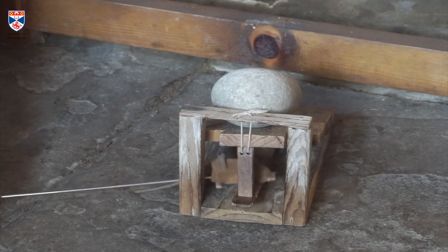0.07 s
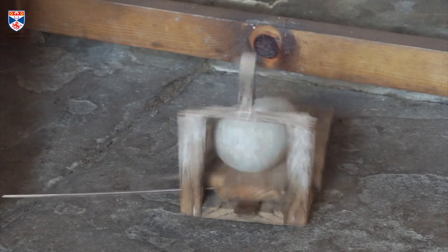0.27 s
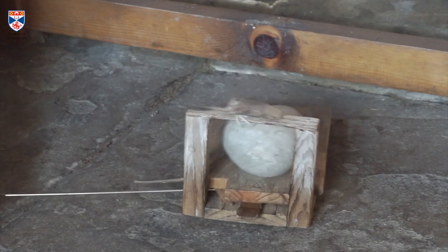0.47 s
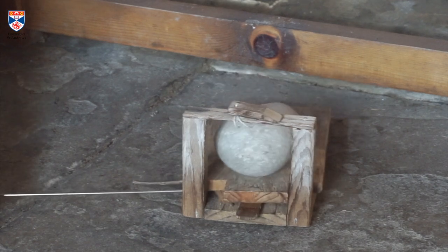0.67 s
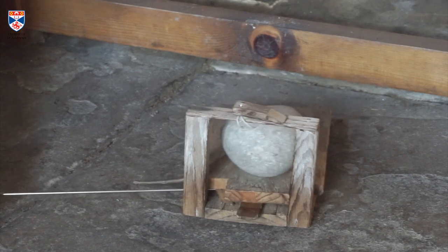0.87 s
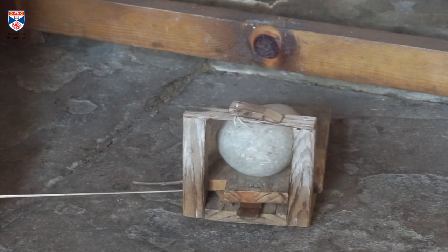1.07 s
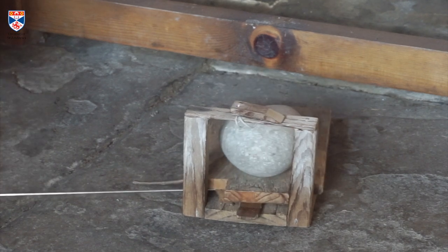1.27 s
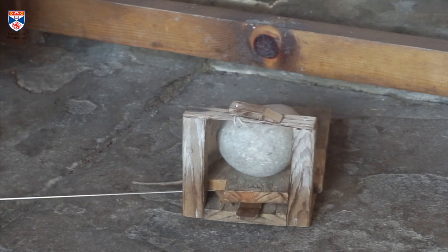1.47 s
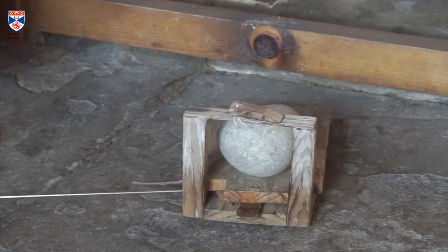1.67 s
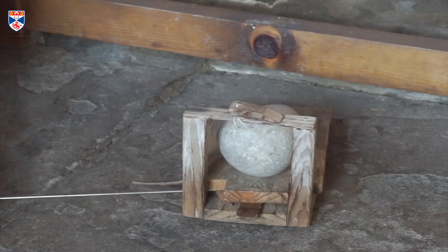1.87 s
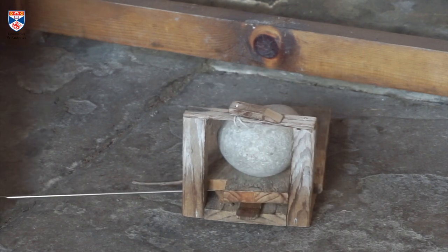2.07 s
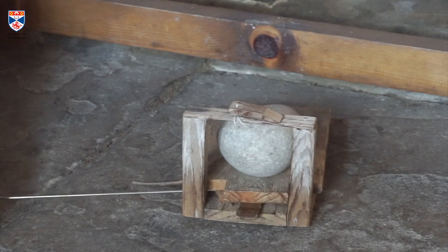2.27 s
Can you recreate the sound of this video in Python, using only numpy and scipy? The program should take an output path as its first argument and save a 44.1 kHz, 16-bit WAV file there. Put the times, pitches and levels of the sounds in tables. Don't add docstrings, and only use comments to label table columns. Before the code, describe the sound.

A stone-weighted wooden trap slams shut, close up in a small hard room. Faint ticks precede a sharp stick crack at 0.25 seconds, then the loud, hollow board slam at 0.34, chattering densely until about 0.5. A small peg ticks at 0.55. Quiet dull knocks come around 1.06 and 2.16, with tiny clicks near 1.5 and 1.75, over steady hiss and a faint low throbbing rumble.

```python
import sys
import numpy as np
from scipy import signal
from scipy.fft import rfft, irfft, next_fast_len
from scipy.io import wavfile
from scipy.ndimage import map_coordinates

SR = 44100
rng = np.random.default_rng(int(sys.argv[2]) if len(sys.argv) > 2 else 0)


def dump_mix(stems):
    frames = np.atleast_2d(stems).T
    limited = np.clip(frames, -1, 1)
    pcm = np.round(limited * 32767).astype(np.int16)
    wavfile.write(sys.argv[1], SR, pcm)


def how_loud(loudness_db):
    steps = np.asarray(loudness_db, float) / 20
    return 10 ** steps


N = 102135


def unit(x):
    return x / np.sqrt(np.mean(x ** 2) + 1e-20)


def along(points, hz):
    f, v = np.transpose(points)
    return np.interp(np.log(hz + 1), np.log(f + 1), v)


def over_time(points):
    return how_loud(np.interp(np.arange(N) / SR, *np.transpose(points)))


def wobble(rate):
    knots = rng.standard_normal(int(N * rate / SR) + 4)
    return map_coordinates(knots, [np.arange(N) * rate / SR])


def filtered(x, response):
    m = next_fast_len(x.shape[-1] + 8192)
    spectrum = rfft(x, m) * response(np.fft.rfftfreq(m, 1 / SR))
    return irfft(spectrum, m)[..., :x.shape[-1]]


def spread(pair, alike):
    def mid_side(hz):
        turn = np.arccos(np.clip(along(alike, hz), -1, 1)) / 2
        return np.array([np.cos(turn), np.sin(turn)])

    mid, side = filtered(pair, mid_side)
    return np.array([mid + side, mid - side])


def noise_pair(colour):
    return filtered(rng.standard_normal((2, N)), lambda hz: how_loud(along(colour, hz)))


# (frequency [Hz], time to fall 60 dB [s])
ROOM_DECAY = [(150, 0.84), (600, 0.33), (1300, 0.28), (3000, 0.28), (6000, 0.35), (11000, 0.089)]
# (frequency [Hz], likeness [0-1])
ROOM_LIKENESS = [(300, .93), (1200, 0.98), (2500, .75), (5000, 0.62), (10000, .05)]


def room(x):
    hz, t, z = signal.stft(rng.standard_normal((2, SR // 2)), SR, nperseg=256)
    decay = how_loud(-60 * t / along(ROOM_DECAY, hz)[:, None])
    tail = signal.istft(z * decay, SR, nperseg=256)[1]
    delay_s = 0.006
    tail = np.pad(spread(tail, ROOM_LIKENESS), ((0, 0), (round(delay_s * SR), 0)))
    return signal.fftconvolve(x[None], tail / np.linalg.norm(tail[0]), axes=1)


TRIM_DB = dict(stick=3, board=-1.5, knock=4.5, tap=16.5, tick=8.5, peg=1, snap=-1.5)
ECHO_DB = dict(stick=-2, board=-4.5, knock=-3.5, tap=-2, tick=-5.5, peg=-5.5, snap=-7.5)
FIRST_TOUCH = dict(stick=2.8, board=4.4, knock=5.3, tap=1.25, tick=0.13, peg=2.44, snap=0.19)
SOFT_HZ = dict(stick=9000, board=5300, knock=3957, tap=4500, tick=20000, peg=8850, snap=20000)
# (frequency [Hz], likeness [0-1])
DIRECT_LIKENESS = [(1000, 0.99), (3000, 0.93), (8000, 0.56)]


def strike(name, s, db, length, body, soft_hz=None):
    u = np.arange(SR // 5) / SR / length
    rough = rng.standard_normal((2, len(u))) * (1 - np.exp(-8 * u)) * np.exp(-2 * u)
    force = rough + FIRST_TOUCH[name] * (u == 0)

    body = np.array(body)
    shift, vary_db = 0.012, 2
    here = body + rng.standard_normal((len(body), 1)) * body * [shift, 0, 0]
    here = here + rng.standard_normal((len(body), 1)) * [0, 0, vary_db]
    thin_hz = 330
    top_hz = soft_hz or SOFT_HZ[name]

    def response(f):
        edges = (1j * f / (thin_hz + 1j * f)) ** 2 / (1 + 1j * f / top_hz) ** 2
        modes = 0
        for k, (centre, width, gain_db) in enumerate(here):
            mode = 1j * f * width / (centre * centre - f * f + 1j * f * width)
            modes = modes + (-1) ** k * how_loud(gain_db) * mode
        return edges * modes

    ring = filtered(force, response)
    ring = how_loud(db + TRIM_DB[name]) * ring / np.abs(ring[0]).max()
    heard = how_loud(ECHO_DB[name]) * room(ring[0])
    heard[:, :len(u)] += spread(ring, DIRECT_LIKENESS)
    out = np.zeros((2, N + SR))
    out[:, round(s * SR):][:, :heard.shape[1]] = heard
    return out[:, :N]


def blows(name, events, body):
    return sum(strike(name, s, db, length, body) for s, db, length in events)


# (time [s], peak level [dB], contact length [s])
BOARD = [(0.297, -15.5, 0.012), (.3433, -4, .002), (0.346, -8.5, 0.0045), (0.35, -4, 0.0071),
         (.354, -4, .005), (.359, -14.5, 0.01), (.367, -15, .006), (0.376, -6.5, 0.006),
         (0.381, -4, 0.0044), (.385, -9.5, 0.0056), (0.394, -14, .004), (0.407, -19.5, 0.0068),
         (0.384, -17, 0.0016), (0.418, -13.5, 0.0058), (0.4254, -5, 0.0047), (.436, -29, 0.0033),
         (0.457, -17, 0.0067), (0.463, -13, 0.0076), (0.492, -22.5, 0.0037), (0.505, -23, 0.0049),
         (0.561, -32.5, 0.0038), (0.577, -37, 0.0032), (0.627, -34, .008), (.642, -39, 0.009),
         (0.676, -63, 0.0036)]
# (frequency [Hz], width [Hz], level [dB])
BOARD_BODY = [(513, 54, -8), (679, 61, -7.5), (760, 89, -8), (921, 72, -6.5), (1146, 120, 3.5),
              (1258, 77, 6.5), (1344, 46, 5.5), (1778, 300, -9), (2430, 240, -15), (2900, 170, -13.5),
              (3740, 870, -19), (4040, 800, -23), (5450, 1400, -29)]


def board():
    return blows("board", BOARD, BOARD_BODY)


THUD_HZ = [99, 181, 275.5]
THUD_DB = [-44, -38.5, -39]


def thud():
    start_s, t60_s = 0.331, 0.21
    t = np.maximum(np.arange(N) / SR - start_s, 0)
    fall_db = -60 * t / t60_s
    return sum(how_loud(db + fall_db) * np.sin(2 * np.pi * hz * t) for hz, db in zip(THUD_HZ, THUD_DB))


# (time [s], peak level [dB], contact length [s])
STICK = [
    (0.2533, -9.5, 0.0028),
    (0.2565, -6, 0.0027),
    (.262, -14, 0.0017),
    (0.27, -19, 0.0079),
    (0.317, -21, .003),
    (.329, -19, .004),
    (0.3545, -10, 0.0016),
    (0.371, -24, .003),
    (0.388, -16, 0.0044),
]
# (frequency [Hz], width [Hz], level [dB])
STICK_BODY = [(470.2, 200, -12), (837.5, 170, -2.5), (1310, 91, 3.5), (1600, 90, -4.5), (1707, 150, 0),
              (2310, 250, -6.5), (2900, 170, -4.5), (3590, 250, -9), (4300, 500, -16.5), (5600, 2300, -24),
              (8000, 2500, -32)]


def stick():
    return blows("stick", STICK, STICK_BODY)


# (time [s], peak level [dB], contact length [s])
PEG = [
    (0.5542, -27, 0.0048),
    (0.633, -42, 0.00444),
]
# (frequency [Hz], width [Hz], level [dB])
PEG_BODY = [(2556, 98, 9.5), (3480, 390, -3.5), (4800, 620, -9.5)]


def peg():
    return blows("peg", PEG, PEG_BODY)


# (time [s], peak level [dB], centre frequency [Hz], length [s])
SNAPS = [(.001, -42, 1400, 0.033), (.002, -54, 300, 0.023), (0.2539, -8, 1736, 0.0022),
         (.2572, -2, 1734, 0.0017), (0.273, -20, 2400, 0.007), (0.313, -25, 490, 0.014),
         (0.3427, -2, 850, 0.00107), (0.3499, -3, 2900, 0.0009), (.387, -17, 2950, 0.0029),
         (0.4227, -8, 880, 0.01), (0.433, -38.5, 326, 0.035), (0.522, -38, 330, 0.015),
         (0.5465, -30, 2560, 0.0015), (1.058, -43, 190, 0.008), (1.498, -32, 9100, 0.023),
         (1.764, -42, 6130, .002), (2.28, -50.5, 2300, .03)]


def snaps():
    sharpness, soft_ratio = 6, 1.6
    return sum(strike("snap", s, db, length, [(hz, hz / sharpness, 0)], soft_ratio * hz)
               for s, db, hz, length in SNAPS)


# (time [s], peak level [dB], centre frequency [Hz], length [s])
TICKS = [(.001, -48, 694, .02), (.001, -53, 1135, 0.047), (.002, -61.5, 2130, .04), (.16, -51, 1600, .005),
         (0.159, -47, 2600, .004), (0.164, -53, 3770, 0.0074), (0.238, -43, 6550, 0.006),
         (.2385, -44, 3230, .008), (0.237, -46.5, 1180, 0.012), (0.4105, -28, 5965, 0.0018),
         (0.638, -52.5, 239, 0.0085), (0.919, -63.5, 1273, 0.01), (.961, -48.5, 1350, 0.0053),
         (.96, -52, 755, .004), (.962, -52.5, 3000, 0.0091), (1.496, -44.5, 6800, 0.025),
         (1.52, -52.5, 4740, 0.0201), (1.5, -56.5, 1560, 0.065), (1.677, -50, 7640, 0.0028),
         (1.732, -60.5, 4260, 0.013), (1.733, -56.5, 1650, .008), (1.764, -53.5, 3950, .003),
         (1.765, -58, 1720, 0.0066), (1.807, -65, 3710, 0.042), (1.914, -60.5, 1654, 0.039),
         (2.22, -60.5, 1400, 0.078), (2.297, -56.5, 3300, 0.031)]


def ticks():
    sharpness = 3
    return sum(strike("tick", s, db, length, [(hz, hz / sharpness, 0), (hz * 1.2, hz / sharpness, -6)])
               for s, db, hz, length in TICKS)


# (time [s], peak level [dB], contact length [s])
KNOCKS = [
    (1.0592, -39, 0.0033),
    (1.0659, -38.5, 0.0055),
    (1.087, -47, 0.003),
]
# (frequency [Hz], width [Hz], level [dB])
KNOCK_BODY = [(188, 6.9, -2.5), (324, 29, -6), (494, 38, -2), (589, 44, 6), (636, 41, 5), (850, 190, -9),
              (1015, 410, -10.5), (1350, 490, -17), (1890, 100, -13), (2300, 380, -16), (3100, 1100, -35)]
# (time [s], peak level [dB], contact length [s])
LATE = [
    (2.1562, -43, 0.0031),
    (2.161, -42.5, 0.0054),
    (2.184, -45.5, 0.0047),
]
# (frequency [Hz], width [Hz], level [dB])
LATE_BODY = [(497, 80, -3), (607.3, 55, 6.5), (632, 36, 11), (732.3, 79, 2), (904, 320, -7.5),
             (1400, 360, -12), (1950, 230, -14), (2400, 360, -14.5), (3650, 1200, -23)]


def knocks():
    return blows("knock", KNOCKS, KNOCK_BODY) + blows("knock", LATE, LATE_BODY)


# (time [s], peak level [dB], contact length [s])
TAPS = [
    (1.576, -50, 0.016),
    (1.737, -73, 0.0037),
]
# (frequency [Hz], width [Hz], level [dB])
TAP_BODY = [(574, 87, 0.5), (834, 60, -2), (1040, 128, -2.5), (1350, 298, -9.5), (1700, 160, -16.5),
            (2300, 910, -19), (3000, 810, -18.5)]


def taps():
    return blows("tap", TAPS, TAP_BODY)


# (multiple of shaft speed [ratio], rms level [dB])
HUM = [(.5, -71.5), (1, -54), (1.5, -79), (2, -60.5), (3, -74), (4, -71.5), (5, -79), (7, -80)]
# (frequency [Hz], level per Hz [dB])
RUMBLE = [(8, -1), (30, -4), (80, -5), (200, -12.5), (400, -34), (1000, -76.5)]
# (time [s], level [dB])
LOAD = [(0, -5.5), (.22, -2), (.5, 1), (1.202, 0), (2.32, -2)]


def machine():
    shaft_hz, drift, sway_db = 25.1, 0.002, 1.5
    turns = np.cumsum(shaft_hz * (1 + drift * wobble(1.5))) / SR
    tones = 0
    for k, db in HUM:
        level = how_loud(db + 2.5 + sway_db * wobble(6))
        tones = tones + level * np.sin(2 * np.pi * (k * turns + rng.random()))
    likeness = [(30, 0.7), (200, 0.31)]  # (frequency [Hz], likeness [0-1])
    rumble = how_loud(-62) * unit(spread(noise_pair(RUMBLE), likeness))
    return over_time(LOAD) * (tones + rumble)


# (frequency [Hz], level per Hz [dB])
HISS = [(20, -12), (100, -2.5), (250, 0.5), (500, 2.5), (1000, -1), (2000, -4), (5000, -5.5), (11000, -7.5)]
# (frequency [Hz], likeness [0-1])
HISS_LIKENESS = [(60, 0.71), (220, 0.28), (830, 0.23), (3100, 0.13), (11600, 0.14)]


def hiss():
    level_db = -55 + 0.74 * wobble(1)
    return how_loud(level_db) * unit(spread(noise_pair(HISS), HISS_LIKENESS))


# (frequency [Hz], level [dB])
LEAN_DB = [(1000, 0), (3000, -1.2), (9000, -2)]


def scene():
    trap = board() + thud() + stick() + peg()
    small = snaps() + ticks()
    far = knocks() + taps()
    halves = np.array([[0.5], [-0.5]])
    hits = filtered(trap + small + far, lambda hz: how_loud(along(LEAN_DB, hz) * halves))
    return hits + machine() + hiss()


def roll_off(x):
    return signal.sosfilt(signal.butter(12, 12170, fs=SR, output="sos"), x)


# (time [s], level [dB])
GAIN = [(0, -1), (.2, 0.5), (.3, -3.5), (.37, 0.5), (.45, -2), (.8, -3.5), (1.2, -1), (2.32, -0.5)]


def record(dry):
    x = dry * over_time(GAIN)
    ceiling, knee = 0.95, 5
    x = x / (1 + np.abs(x / ceiling) ** knee) ** (1 / knee)
    top_hz, leak_db = 11000, -38
    mix = filtered(x, lambda hz: 1 / (1 + (hz / top_hz) ** 160) + how_loud(leak_db))
    return roll_off(mix)


dry = scene()
out = record(dry)
dump_mix(out)
```